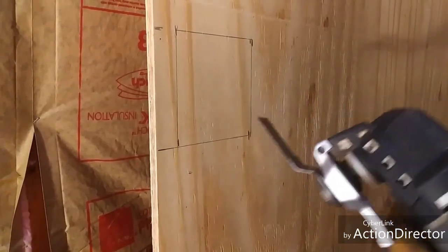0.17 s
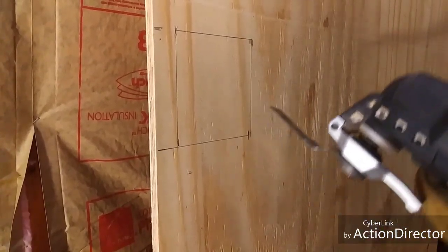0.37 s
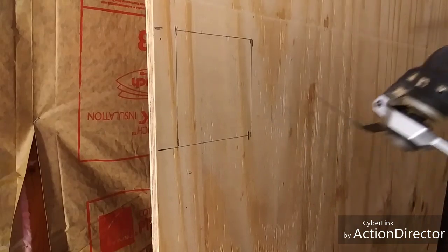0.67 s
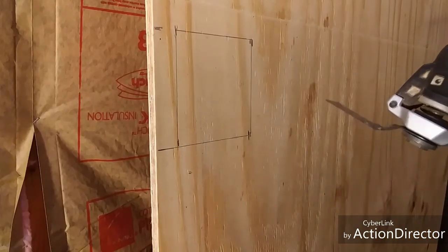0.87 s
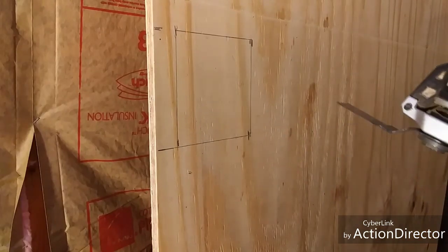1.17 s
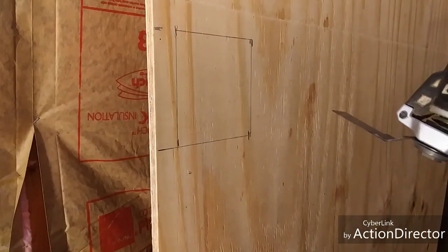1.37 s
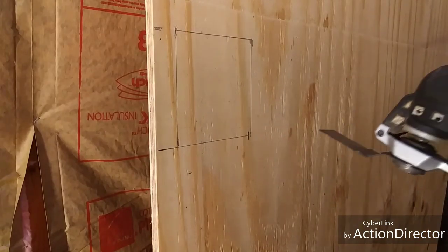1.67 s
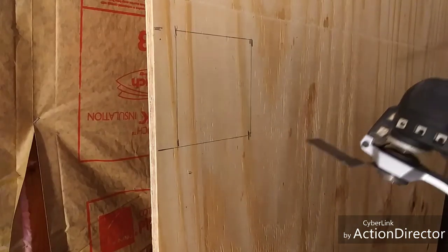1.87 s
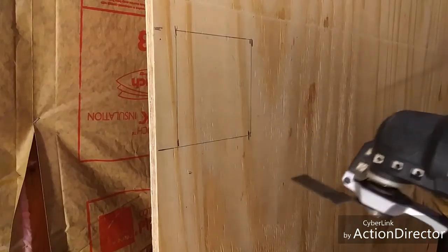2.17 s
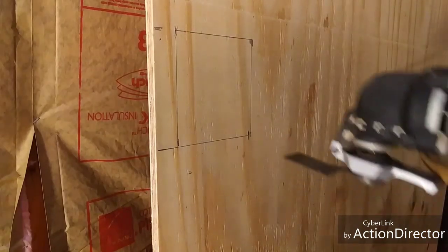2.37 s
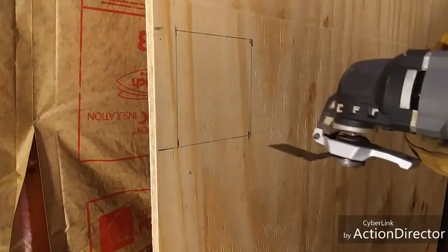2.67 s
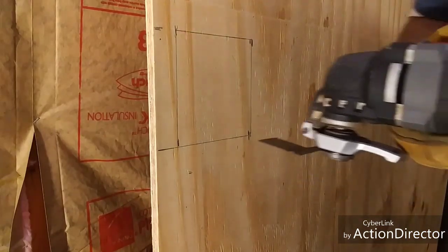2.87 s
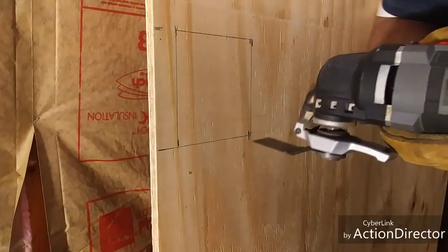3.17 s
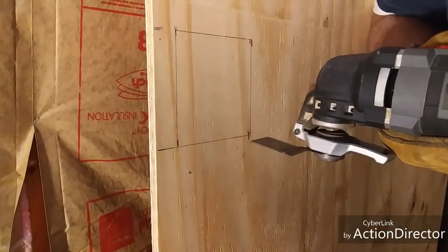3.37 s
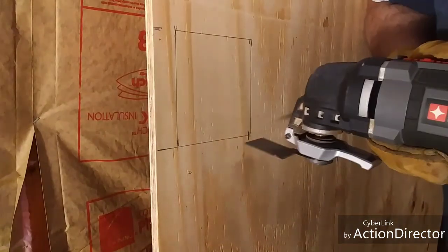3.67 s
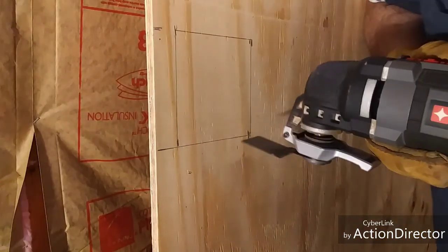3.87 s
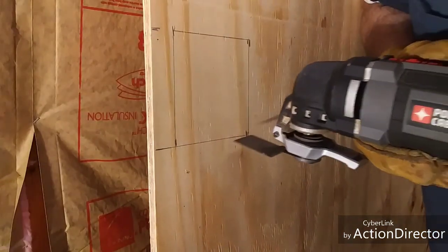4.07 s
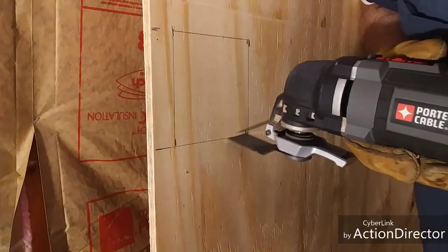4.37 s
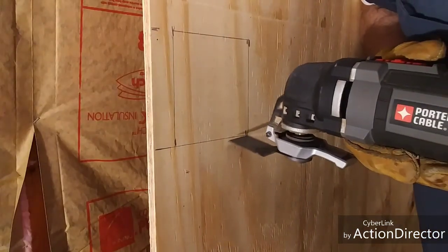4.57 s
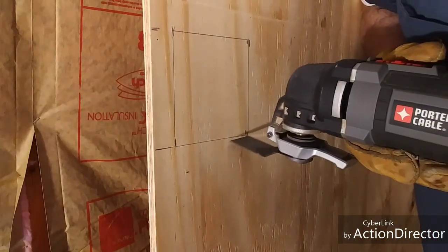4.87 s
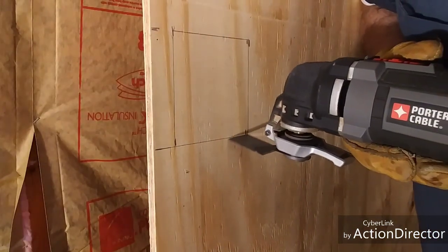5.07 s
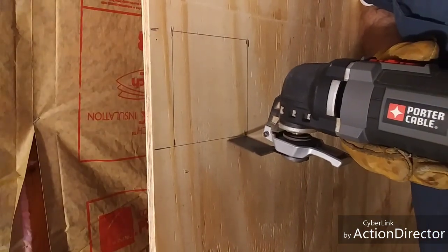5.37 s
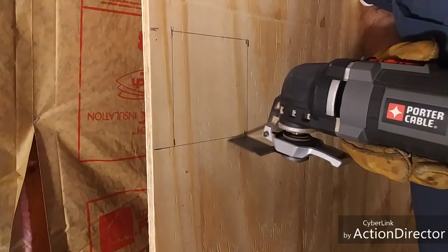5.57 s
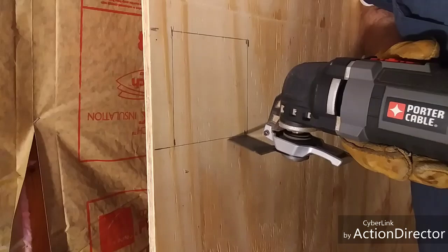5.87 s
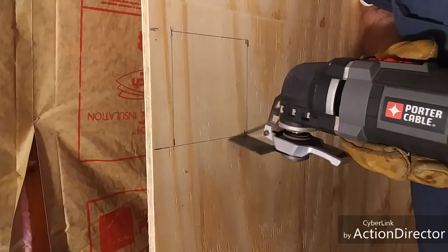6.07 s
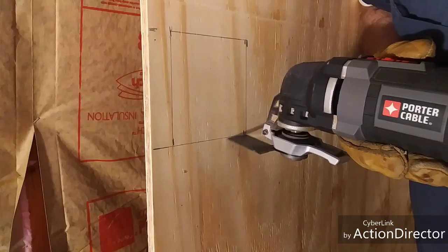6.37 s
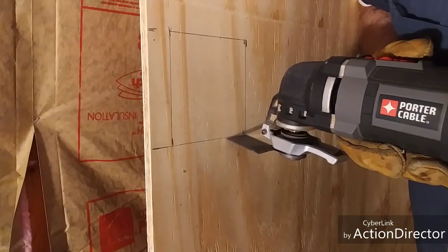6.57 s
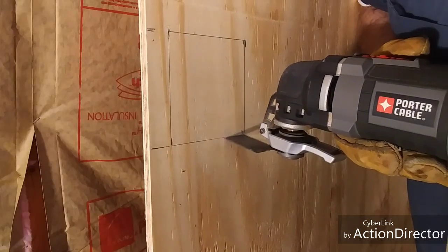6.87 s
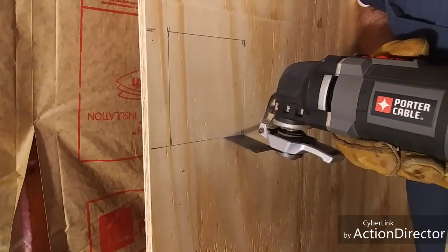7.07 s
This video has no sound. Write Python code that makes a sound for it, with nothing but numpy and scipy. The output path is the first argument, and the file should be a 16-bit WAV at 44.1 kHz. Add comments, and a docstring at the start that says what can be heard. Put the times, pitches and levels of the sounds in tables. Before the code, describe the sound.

Quiet rustling and small clicks in a workshop, then a power multi-tool whirs up sharply, buzzes loudly and steadily, and chatters into wood.

```python
"""In a small rumbling workshop a glove and sleeve rustle round an oscillating multi-tool; switch and dial click.
Switched on, the motor gathers speed: brushes and loose blade sing, the fan rushes, and housing and blade
buzz on multiples of the turning rate, since each turn swings the blade once. The tool runs free and nears
a plywood panel; the blade skims and bounces with scraping noise, then bites and loads the motor."""
import sys
import numpy as np
from scipy import signal
from scipy.fft import rfft, irfft
from scipy.io import wavfile
from scipy.ndimage import uniform_filter1d

SR = 44100
rng = np.random.default_rng(int(sys.argv[2]) if len(sys.argv) > 2 else 0)


def wav_out(sig):
    """Save sig, one row per channel (or a flat mono array), as 16-bit PCM at SR to the path in sys.argv[1]."""
    wavfile.write(sys.argv[1], SR, np.round(np.clip(np.atleast_2d(sig).T, -1, 1) * 32767).astype(np.int16))


N = 317520

# turning rate that the run-up closes in on, later sagging as the blade bites: (t/s, rate/turns per s)
PACE = [(1.85, 335), (2.0, 334.5), (2.12, 329.3), (2.36, 340.4), (2.47, 343), (2.85, 340.3), (3.61, 338.4),
        (3.95, 335.4), (4.62, 338.5), (5.34, 340.2), (5.97, 340.5), (6.5, 336.6), (6.8, 331.3), (6.93, 327),
        (7.07, 327.3), (7.2, 324.6)]
SWITCH_ON_S, SPIN_UP_S = 1.852, 0.11   # start, and time constant of the run-up
# buzz while gathering speed, in free air, close to the panel, skimming, chattering, biting:
# (held from t/s, level/dB, held to t/s, level/dB, fade in/dB per s, fade out/dB per s)
STANCES = [(2.0, -22, 2.38, -18, 200, 90), (2.45, -14.5, 4.05, -19, 70, 110),
           (3.7, -16.5, 5.3, -15, 20, 30), (4.85, -21.5, 5.742, -16, 39, 18),
           (6.05, -17, 6.78, -18.5, 59, 220), (6.55, -20.5, 6.92, -11.5, 140, 0.5)]
# how hard the blade bounces: (t/s, depth/0-1)
BOUNCE = [(5.8, 0), (6.2, .55), (6.55, .55), (6.65, .15), (6.8, 0)]
BOUNCES_PER_S = 55


def tool():
    """One turning motor drives every layer: hum, buzz, whine, blade, fan, rattle and scrape."""
    since = np.maximum(np.arange(N) / SR - SWITCH_ON_S, 1e-3)
    reached = 1 - np.exp(-since / SPIN_UP_S)
    per_s = uniform_filter1d(in_time(PACE)[0], size=2000) * reached   # inertia rounds the changes
    turn = 2 * np.pi * np.cumsum(per_s) / SR
    stance_db = np.array([held(*row) for row in STANCES])

    depth, = in_time(BOUNCE)
    hop = 2 * np.pi * np.cumsum(BOUNCES_PER_S + 2.4 * drift(12.2)) / SR
    reversals = 1 + 0.21 * np.cos(2 * turn) + 0.1 * np.cos(turn)   # play knocks at both ends of the swing
    fan_db, rattle_db = in_time(RUSH)

    tones = motor_hum(turn, reached, stance_db[-1]) + brush_whine(turn) + blade_song()
    noises = fan_rush(fan_db) + gear_rattle(rattle_db, reversals) + wood_scrape(depth, hop, reversals)
    running = np.arange(N) > 1.862 * SR
    return running * (tones + noises + buzz(turn, per_s, stance_db, hop, depth, wander_db=0.95, wobble=0.012))


# strength of the multiples of the turning rate in each stance: (multiple, level/dB)
GATHER = [(1, -5), (2, -4), (3, -0.5), (4, -9), (5, -11), (6, -17), (7, -9), (8, -10), (9, -8.5), (10, -9),
          (11, -6.5), (12, -7), (13, -7), (14, -4), (15, -8.5), (16, -10), (17, -9), (18, -8), (19, -21),
          (20, -11.5), (21, -18), (22, -18), (23, -25), (24, -22), (25, -16), (26, -25), (27, -21),
          (28, -26), (29, -39), (30, -30)]
FREE = [(1, -4), (2, -9.5), (3, -4.5), (4, -12.5), (5, -10), (6, -11.5), (7, -13), (8, -22.5), (9, -9.5),
        (10, -10.5), (11, -11.5), (12, -11), (13, -2), (14, -0.5), (15, -5), (16, -21), (17, -12),
        (18, -42.5), (19, -9.5), (20, -31), (21, -7.5), (22, -16), (23, -26), (24, -24), (25, -22),
        (26, -15), (27, -26), (28, -25), (29, -18.5), (30, -15), (31, -18), (32, -16), (33, -26), (34, -27),
        (35, -24), (36, -37)]
CLOSE = [(1, -5), (2, -0.5), (3, 0.5), (4, -9), (5, -26), (6, -7), (7, -9.5), (8, -12.5), (9, -7),
         (10, -8.5), (11, -8), (12, -21), (13, -60), (14, -8), (15, -7.5), (16, -18), (17, -12.5),
         (18, -16.5), (19, -9.5), (20, -17), (21, -9), (22, -14.5), (23, -14), (24, -14), (25, -19),
         (26, -19), (27, -14), (28, -15.5), (29, -35), (30, -13.5), (31, -15), (32, -20.5), (33, -18),
         (34, -32), (35, -20), (36, -34), (37, -36)]
SKIM = [(1, -5), (2, 1.5), (3, -3.5), (4, -27), (5, -8.5), (6, -11.5), (7, -16), (8, -11), (9, -7.5),
        (10, -6), (11, -4.5), (12, -10.5), (13, -12), (14, -8.5), (15, -6), (16, -7), (17, -8.5), (18, -12),
        (19, -36), (20, -15), (21, -10), (22, -21), (23, -13.5), (24, -23), (25, -24), (26, -11.5),
        (27, -14.5), (28, -25), (29, -21), (30, -18), (31, -16), (32, -46), (33, -30)]
CHATTER = [(1, -7), (2, 0.5), (3, -10), (4, -11.5), (5, -7.5), (6, -6), (7, -9.5), (8, -11.5), (9, -14),
           (10, -5.5), (11, -1), (12, -5.5), (13, -24), (14, -5.5), (15, -10), (16, -15), (17, -11.5),
           (18, -20), (19, -21), (20, -18), (21, -21), (22, -23), (23, -14.5), (24, -14), (25, -15),
           (26, -12.5), (27, -11), (28, -16), (29, -21), (30, -16), (31, -14), (32, -21), (33, -27)]
BITE = [(1, -11), (2, 3), (3, -4), (4, -5.5), (5, -4), (6, -5.5), (7, -27), (8, -9), (9, -6.5), (10, -5.5),
        (11, -1.5), (12, -10.5), (13, -8.5), (14, -16), (15, -9), (16, -13), (17, -15), (18, -15),
        (19, -18), (20, -22), (21, -14), (22, -16.5), (23, -20), (24, -33), (25, -28), (26, -18), (27, -18),
        (28, -11), (29, -21), (30, -35), (31, -32), (32, -21), (33, -23), (34, -32), (35, -32), (36, -39)]
# multiples that a stance's table leaves out, one value per stance in that order: (level/dB)
TOP_DB = [-45, -33, -31, -48, -42, -36]
# housing resonances that light up each multiple as it glides past while gathering speed: (f/Hz, level/dB)
PASSING = [(500, -8), (800, 4.5), (1300, 0), (2000, 3.5), (2600, 1), (3100, -3), (3900, 0.5), (4400, -0.5),
           (4800, 1), (5400, 4.5), (5900, -3), (6600, 3), (7500, 1), (8700, -4), (10000, -10)]


def buzz(turn, per_s, stance_db, hop, depth, wander_db, wobble):
    """Every multiple above the first sums the power of the stances, wanders and throbs with the bounce."""
    gains, out = from_db(stance_db) ** 2, 0
    phases = rng.standard_normal((46, 2)) * 2.47
    phases[:, 0] *= np.minimum(np.arange(46) / 16.7, 1)   # low multiples keep in step: one upward knock a turn
    body_hz, body_db = np.transpose(PASSING)
    tables = [dict(orders) for orders in (GATHER, FREE, CLOSE, SKIM, CHATTER, BITE)]
    spin = np.exp(1j * (turn + wobble * drift(60)))   # play in the bearings jitters the swing
    # strain shifts strength among the upper multiples
    unrest_db = 27.0 * np.sqrt(gains[0]) + 10.5 * np.sqrt(gains[-1])
    power = spin
    for k in range(2, 46):
        power = power * spin
        levels_db = [[table.get(k, top_db)] for table, top_db in zip(tables, TOP_DB)]
        shares = from_db(levels_db) ** 2 * gains
        shares[0] *= from_db(np.interp(k * per_s, body_hz, body_db)) ** 2
        height = np.sqrt(2 * shares.sum(axis=0))
        upper = k > 3   # the heavy low swing rides through the bounce
        throb = 1 + upper * depth * np.sin(hop + phases[k, 1])
        restless_db = wander_db * (1 + k / 26.5) * drift(2.6) + upper * unrest_db * drift(9.2)
        tone = (np.exp(1j * phases[k, 0]) * power).real
        out = out + from_db(restless_db) * height * throb * tone
    return out


HUM_DB, HUM_DB_PER_OCTAVE, HUM_BITE_DB = -19.5, 23, 3   # at full speed, growth with speed, lift by the bite


def motor_hum(turn, reached, bite_db):
    """The once-a-turn swing hums louder with speed and under the bite."""
    speed_db = HUM_DB + HUM_DB_PER_OCTAVE * np.log2(reached)
    bite_lift_db = HUM_BITE_DB * from_db(bite_db - bite_db.max())
    level_db = speed_db + bite_lift_db + 0.72 * drift(2.6)
    return np.sqrt(2) * from_db(level_db) * np.cos(turn)


# contact of blade resting on the wood: (held from t/s, level/dB, to t/s, level/dB, in/dB per s, out/dB per s)
TOUCH = (6, -23.5, 6.5, -25, 30, 40)
# teeth catch the grain: (t/s, peak level/dB)
GRABS = [(6.0, -20), (6.23, -13), (6.4, -13.5), (6.55, -10), (6.71, -14)]
GRAB_RISE, GRAB_FALL = 230, 260   # dB per s
# colour of the scraping: (f/Hz, relative level/dB per Hz)
SCRAPE = [(300, -7), (900, -5), (1900, 4), (2700, 1), (3800, 3), (5200, 2.5), (7500, -7), (8600, -14),
          (9300, -10), (9900, -16), (10500, -10), (11300, -18), (13000, -28), (15500, -22)]


def wood_scrape(depth, hop, reversals):
    """Teeth rub noise out of the wood, pulsed by the swing and by the bounce."""
    contact = from_db(held(*TOUCH)) + swells(GRABS, GRAB_RISE, GRAB_FALL)
    bounce = 1 + 0.5 * depth * np.sin(hop)   # the blade skips off the wood and lands again
    return contact * bounce * coloured(SCRAPE, noise() * reversals, patchy_db=0.5)


# singing of the loose blade: (held from t/s, level/dB, to t/s, level/dB, in/dB per s, out/dB per s)
BLADE_HOLD = (1.98, -24, 2.25, -26, 900, 130)
BLADE_HZ, BLADE_WIDTH_HZ = 8700, 150


def blade_song():
    """The loose blade, a narrow resonance fed with noise, sings while the speed builds."""
    sings = signal.lfilter(*signal.iirpeak(BLADE_HZ, BLADE_HZ / BLADE_WIDTH_HZ, SR), noise())
    return from_db(held(*BLADE_HOLD)) * rms_one(sings)


# brush whine: (held from t/s, level/dB, to t/s, level/dB, in/dB per s, out/dB per s)
WHINE_HOLD = (1.89, -27, 1.97, -31, 1700, 300)
# first three multiples of the bar rate: (relative level/dB)
WHINE_DB = [-2, 0, -3]
COMMUTATOR_BARS = 24


def brush_whine(turn):
    """Brushes crossing the commutator bars sing while the current is high."""
    bars = sum(from_db(db) * np.sin((k + 1) * COMMUTATOR_BARS * turn) for k, db in enumerate(WHINE_DB))
    return from_db(held(*WHINE_HOLD) + 5.2 * drift(60)) * bars


# noises of the running tool: (t/s, fan rush level/dB, gear and brush rattle level/dB)
RUSH = [(1.865, -61, -21.5), (1.9, -27, -24.5), (1.95, -14.5, -19.5), (2.0, -18, -15.5),
        (2.15, -18.5, -15.5), (2.4, -20.5, -17), (2.8, -20, -17), (4.0, -16, -19), (5.0, -16.5, -20),
        (5.5, -15.5, -17.5), (5.9, -15, -20.5), (6.3, -16, -21), (6.75, -16, -19), (7.2, -18.5, -22)]
# colour of the fan: (f/Hz, relative level/dB per Hz)
FAN = [(40, -24), (200, -23), (450, -13.5), (650, -1.5), (850, -1), (1200, -6.5), (1600, -8.5),
       (2200, -31.5), (4000, -28)]


def fan_rush(level_db):
    """The cooling fan's air is noise with a slightly patchy colour."""
    return from_db(level_db) * coloured(FAN, noise(), patchy_db=1.25)


# colour of the rattle: (f/Hz, relative level/dB per Hz)
RATTLE = [(1200, -1), (1800, -4.5), (2300, -5.5), (2800, -7), (3500, -3), (4300, -2.5), (5200, 0),
          (6300, -3), (7500, -4.5), (9000, -9), (10800, -12.5), (12000, -35), (13500, -46), (15500, -30)]


def gear_rattle(level_db, reversals):
    """Gear and brushes rattle as noise that swells at the ends of the swing."""
    return from_db(level_db) * coloured(RATTLE, noise() * reversals, patchy_db=1.7)


# blows of switch and dial, before they ring: (t/s, rms level/dB, burst decay/s, lowest f/Hz, highest f/Hz)
CLICKS = [(0.8723, -41.5, 0.0018, 1830, 9000), (1.085, -75, 0.0012, 800, 5000),
          (1.2934, -51.5, 0.001, 700, 12000), (1.86, -33.5, 0.002, 2500, 14000),
          (1.8661, -41, 0.0016, 596, 1500)]
# ringing of the plastic housing: (f/Hz, relative level/dB, t60/s)
HOUSING = [(720, -4.5, 0.019), (1160, -6, 0.015), (2180, -3, .01), (2670, -12, 0.012), (3310, 0, 0.0067),
           (4160, -6.5, 0.0094), (4600, -3.5, 0.005), (5160, -6, 0.0084), (5990, -2.5, 0.0043),
           (6870, -7, 0.014), (7700, -4.5, 0.0034), (9000, -7, .004), (10000, -4, .004), (11500, -14, .002),
           (13000, -13, .002), (14800, -17, .002)]


def clicks():
    """Short dying bursts, dull or sharp, ring the plastic housing."""
    blows = np.zeros(N) + 1e-18
    for s, blow_db, burst_s, low_hz, high_hz in CLICKS:
        burst = rng.choice([-1, 1], 600) * np.exp(-np.arange(600) / (burst_s * SR))
        burst = signal.lfilter(*signal.butter(2, [low_hz, high_hz], "band", fs=SR), burst)
        blows[round(s * SR):][:600] += from_db(blow_db) * rms_one(burst)
    out = 0
    for k, (hz, level_db, t60) in enumerate(HOUSING):
        r, w = from_db(-60 / (t60 * SR)), 2 * np.pi * hz / SR
        strike = [0, from_db(level_db) * np.sin(w)]
        ring = [1, -2 * r * np.cos(w), r * r]
        out = out + (-1) ** k * signal.lfilter(strike, ring, blows)
    return out


ROOM_T60_S, ROOM_DB = 0.15, -19.5


def room(x):
    """Walls answer after a short gap with a dull dying tail."""
    t = np.arange(SR // 3) / SR
    tail = rng.standard_normal(len(t)) * from_db(-60 * t / ROOM_T60_S) * (t > 0.009)
    tail = signal.lfilter(*signal.butter(1, 7000, fs=SR), tail)
    return from_db(ROOM_DB) * signal.fftconvolve(x, tail / np.sqrt(np.sum(tail ** 2)))[:N]


# glove and sleeve brush by: (t/s, peak level/dB)
RUSTLES = [(.1, -53.5), (.31, -44), (.39, -54), (.5, -61), (.6, -56)]
RUSTLE_RISE, RUSTLE_FALL = 170, 170   # dB per s
# faint cloth noise beneath them: (t/s, level/dB)
STIRRING = [(0, -72), (.7, -57.5), (1.2, -62), (1.84, -63.5)]
# colour of the cloth: (f/Hz, relative level/dB per Hz)
CLOTH = [(500, 8), (1000, -4), (1700, 1), (2800, 2), (4500, 1.5), (6500, -3), (9500, -8), (12000, -17),
         (15000, -30)]


def cloth_rustle():
    """Rubbing cloth is grainy noise that swells with each movement."""
    grains = noise() * from_db(1.0 * drift(48))
    rustle = from_db(in_time(STIRRING)[0]) + swells(RUSTLES, RUSTLE_RISE, RUSTLE_FALL)
    return rustle * coloured(CLOTH, grains, patchy_db=0.5)


# tones of the distant machine, to which the swell's level is added: (f/Hz, level/dB)
HUM = [(166.9, -67.5), (247.6, -66)]
HUM_SWELL_S, HUM_SWELL_DB, HUM_SWELL_RISE = 1.1, 6, 20   # fully up at s, added dB then, rise until then in dB per s


def distant_hum():
    """A distant machine's tones swell up, then hum on with slightly wavering levels."""
    t = np.arange(N) / SR
    tones = sum(np.sqrt(2) * from_db(db + 2 * drift(3.5)) * np.sin(2 * np.pi * hz * t) for hz, db in HUM)
    swell_db = HUM_SWELL_DB - HUM_SWELL_RISE * np.maximum(HUM_SWELL_S - t, 0)
    return from_db(swell_db) * tones


# colour of background rumble and hiss: (f/Hz, relative level/dB per Hz)
SHOP = [(40, -24), (75, -1), (110, -8), (200, -11), (268, 3.5), (330, -6.5), (600, -13), (1500, -18.5),
        (3000, -32), (7000, -36), (9500, -29), (11500, -41), (15500, -48)]
SHOP_DB, SHOP_FADE = -50.5, 3.5   # level at the start in dB, sinking in dB per s


def shop_rumble():
    """The background of the workshop is rumbling, hissing noise that slowly sinks."""
    t = np.arange(N) / SR
    return from_db(SHOP_DB - SHOP_FADE * t) * coloured(SHOP, noise(), patchy_db=1.5)


def from_db(db):
    """Level in dB to gain."""
    return 10 ** (np.asarray(db) / 20)


def rms_one(x):
    """Scaled to rms 1."""
    return x / np.sqrt(np.mean(x ** 2) + 1e-20)


def noise():
    """White noise."""
    return rng.standard_normal(N)


def in_time(rows):
    """Columns of a curve, one value per sample."""
    s, *columns = np.transpose(rows)
    return [np.interp(np.arange(N) / SR, s, column) for column in columns]


def held(from_s, first_db, to_s, last_db, rise, fall):
    """Level in dB: fades in, glides between two values, fades out."""
    t = np.arange(N) / SR
    glide_db = np.interp(t, [from_s, to_s + 1e-6], [first_db, last_db])
    return glide_db - rise * np.maximum(from_s - t, 0) - fall * np.maximum(t - to_s, 0)


def swells(rows, rise, fall):
    """Gain of a run of peaks that share one rise and fall."""
    return sum(from_db(held(s, peak_db, s, peak_db, rise, fall)) for s, peak_db in rows)


def drift(rate_hz):
    """Slow chance of spread 1: noise, one value per 40 samples, through a double one-pole low-pass."""
    r = np.exp(-80 * np.pi * rate_hz / SR)
    sparse = rng.standard_normal(N // 40 + 2002)
    slow = signal.lfilter([1], [1, -2 * r, r * r], sparse)[2000:]   # drop the filter's settling
    return np.interp(np.arange(N) / 40, np.arange(len(slow)), rms_one(slow))


def coloured(spectrum, source, patchy_db):
    """A source shaped by a spectrum, in octave bands that flicker on their own; rms 1."""
    hz = np.maximum(np.arange(N // 2 + 1) * SR / N, 1)
    table = np.array(spectrum)
    shape_db = np.interp(np.log(hz), np.log(table[:, 0]), table[:, 1], left=-60)
    shaped = rfft(source) * from_db(shape_db)
    octave = np.log2(hz / 30)
    bands = (irfft(shaped * np.clip(1 - abs(octave - k), 0, 1), N) for k in range(10))
    return rms_one(sum(band * from_db(patchy_db * drift(7.3)) for band in bands))


def scene():
    """Tool, clicks with their room and the background, alike on both channels."""
    struck = clicks()
    background = cloth_rustle() + distant_hum() + shop_rumble()
    return np.tile(tool() + struck + room(struck) + background, (2, 1))


CEILING, CUTOFF_HZ = 0.95, 15800   # amplitude where overload sets in, start of the stop band


def record(dry):
    """Overload flattens the peaks, the top is cut."""
    squeezed = dry / (1 + abs(dry / CEILING) ** 4.36) ** (1 / 3.7)
    return signal.sosfilt(signal.cheby2(20, 60, CUTOFF_HZ, fs=SR, output="sos"), squeezed)


dry = scene()
out = record(dry)
wav_out(out)
```